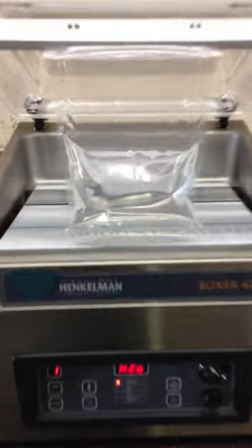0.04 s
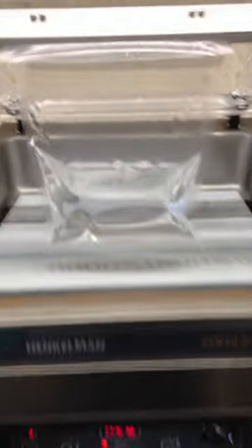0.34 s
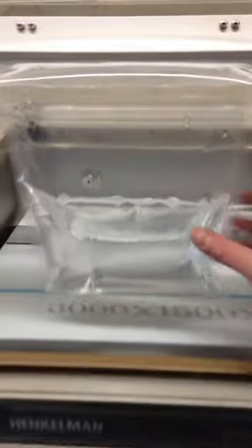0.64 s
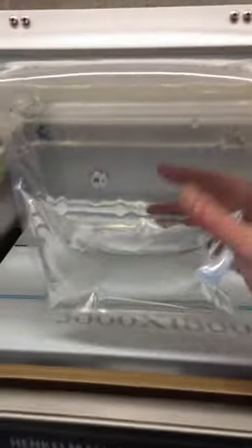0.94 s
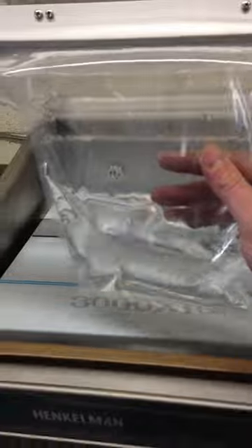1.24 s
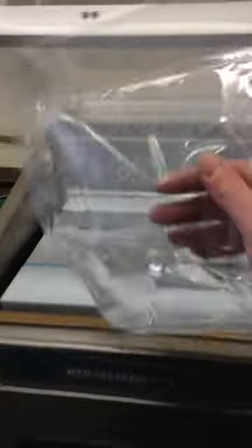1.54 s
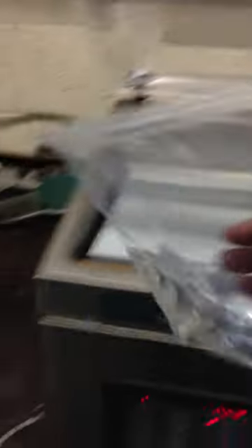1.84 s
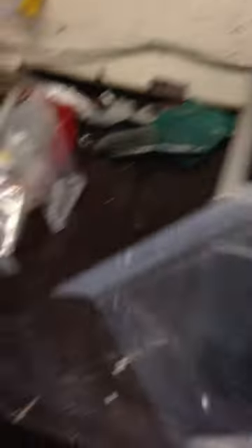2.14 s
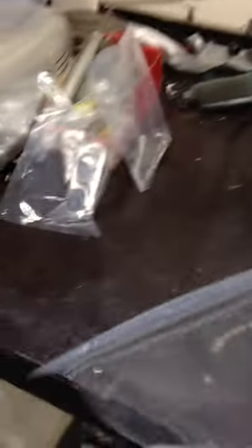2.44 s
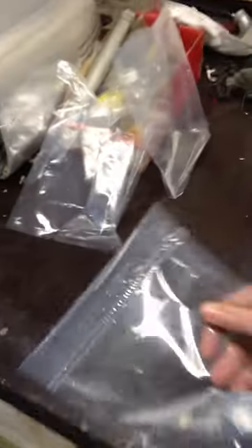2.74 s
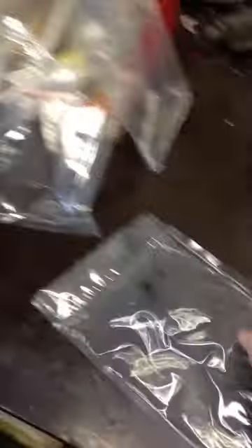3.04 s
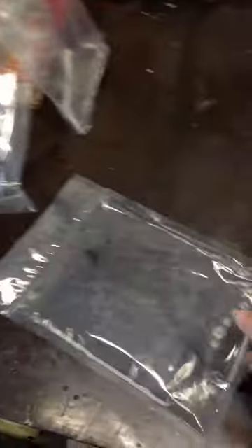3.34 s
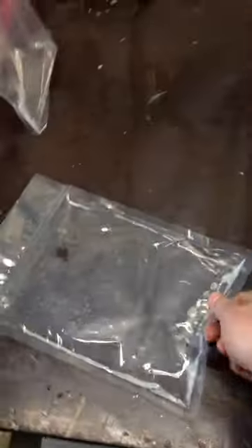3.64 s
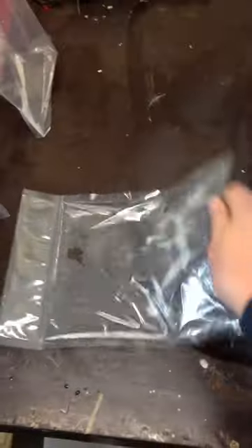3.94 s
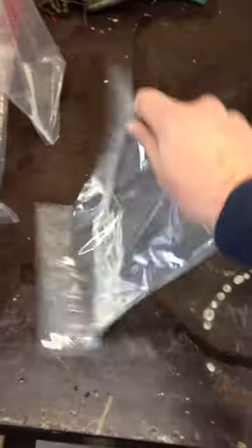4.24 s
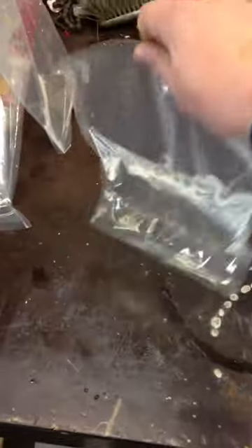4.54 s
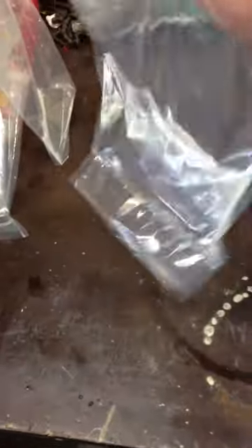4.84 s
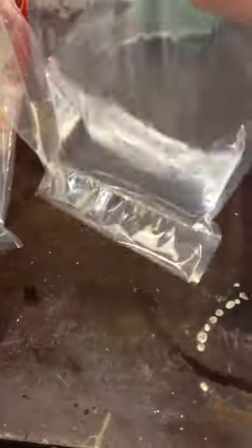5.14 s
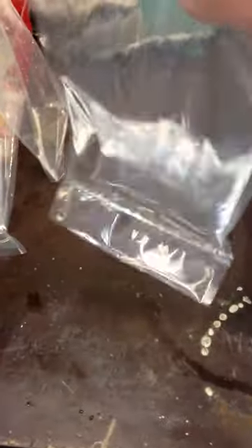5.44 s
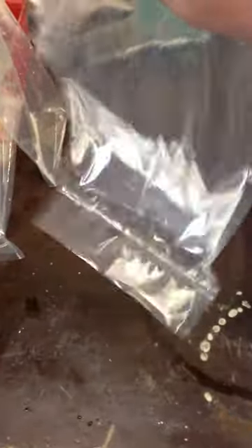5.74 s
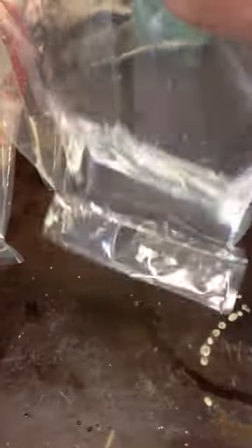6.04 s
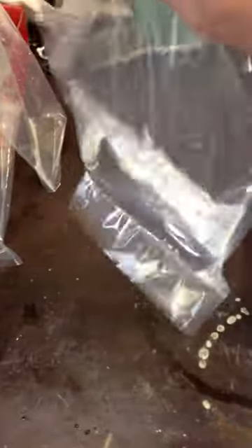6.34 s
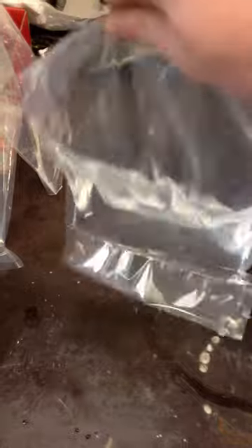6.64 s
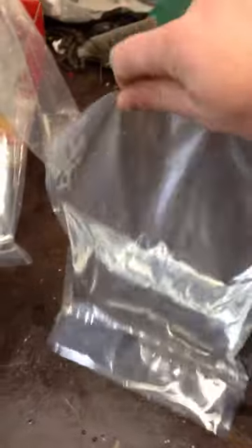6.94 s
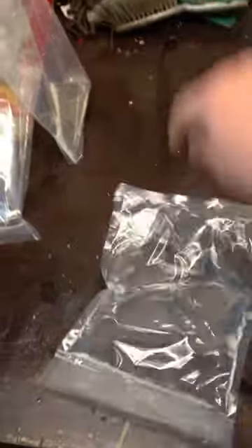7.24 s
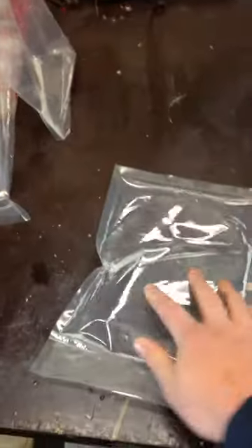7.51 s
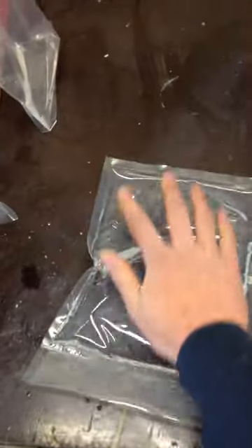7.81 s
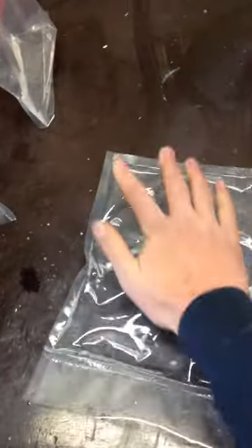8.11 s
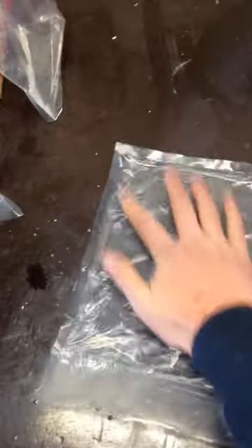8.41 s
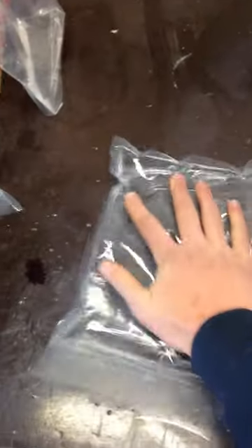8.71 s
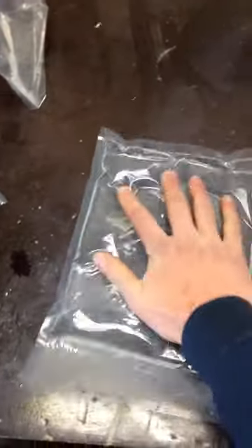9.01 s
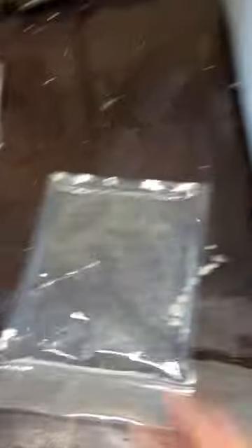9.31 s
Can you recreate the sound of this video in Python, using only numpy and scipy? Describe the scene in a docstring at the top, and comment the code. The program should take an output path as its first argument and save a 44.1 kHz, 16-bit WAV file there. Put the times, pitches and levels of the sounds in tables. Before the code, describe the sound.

Close up in a small room with a short echo, sharp plastic crackles come from a sealed bag of water being picked up. It lands with a slap on a bench, followed by a hollow, humming thud and faint sliding. Quick shaking brings rhythmic sloshing mixed with snapping creases. Then the bag smacks down once more and takes five even, squelchy hand pats that thump the bench top.

```python
"""A sealed plastic bag holding some water, handled at a workbench in a small hard room, one close microphone.
Lifted out of an idle vacuum packer, its stiff film snaps and rustles as creases flip. It is tossed on
the bench; something hollow is bumped and hums on. The bag is slid, then shaken so that the water slaps
the film and traps bubbles. Last it is dropped and patted five times with a flat hand, knocking the bench."""
import sys
import numpy as np
from scipy import signal
from scipy.fft import rfft, irfft, next_fast_len
from scipy.io import wavfile
from scipy.ndimage import map_coordinates

SR = 44100
rng = np.random.default_rng(int(sys.argv[2]) if len(sys.argv) > 2 else 0)


def persist_wave(psi):
    """Save psi, clipped to +-1, as 16-bit WAV."""
    counts = np.round(np.clip(psi, -1, 1) * 32767).astype(np.int16)
    wavfile.write(sys.argv[1], SR, np.atleast_2d(counts).T)


N = 422037
LEAD_S = 0.04  # time a crumple is given to swell to its peak


def amp(db):
    """Decibels to gain."""
    return 10 ** (np.asarray(db) / 20)


def unit(x):
    """Scaled to rms 1."""
    return x / np.sqrt(np.mean(x ** 2) + 1e-20)


def along(points, hz):
    """(frequency [Hz], value) points read on a log axis."""
    freqs, values = np.transpose(points)
    return np.interp(np.log(hz + 1), np.log(freqs + 1), values)


def hump(hz, centre_hz, octaves):
    """A broad resonance of height 1."""
    return 1 / (1 + (np.log2((hz + 1) / centre_hz) / octaves) ** 2)


def envelope(t, rise, hold, t60):
    """Swells up to time 0, holds, then dies away; all in seconds."""
    return np.exp(np.minimum(t, 0) / rise) * amp(-60 * np.maximum(t - hold, 0) / t60)


def wobble(rate):
    """A smooth random curve, rate knots a second."""
    knots = rng.standard_normal(int(N * rate / SR) + 4)
    return map_coordinates(knots, [np.arange(N) * rate / SR])


def add(track, s, x):
    """Mix x into the track from time s on."""
    part = track[round(s * SR):][:len(x)]
    part += x[:len(part)]


def coloured(x, db_at):
    """x through a causal filter whose gain in dB is a function of frequency."""
    size = 2 * next_fast_len(len(x) // 2 + 1024)
    cepstrum = irfft(np.log(amp(db_at(np.fft.rfftfreq(size, 1 / SR)))), size)
    cepstrum[1:size // 2] *= 2  # folded onto positive time: minimum phase
    cepstrum[size // 2 + 1:] = 0
    return irfft(rfft(x, size) * np.exp(rfft(cepstrum)), size)[:len(x)]


def shaped(x, spectrum):
    """x filtered by the given spectrum, at rms 1."""
    return unit(coloured(x, lambda hz: along(spectrum, hz)))


def crackle(size, rate, spread_db):
    """Tiny bucklings of the film: random clicks of unequal size, rate a second, rms 1."""
    sizes = rng.choice([-1, 1], size) * amp(spread_db * np.clip(rng.standard_normal(size), -2, 2))
    return unit(sizes * (rng.random(size) < rate / SR))


def film(x, colour, bass_db, treble_db):
    """The film radiates x: wide folds give more bass, tight creases more treble."""
    wide, tight = [(700, 0.74), (1600, 0.00122)], [(3200, 0.014), (7000, 0.6)]
    return coloured(
        x, lambda hz: along(colour, hz) + bass_db * along(wide, hz) + treble_db * along(tight, hz))


def ring(modes, t, scatter_db, attack):
    """Damped modes, struck at new strengths each time."""
    hz, db, t60 = np.transpose(modes)[:, :, None]
    strength = amp(db + scatter_db * rng.standard_normal(hz.shape) - 60 * t / t60)
    swing = np.sin(2 * np.pi * hz * t + rng.uniform(0, 2 * np.pi, hz.shape))
    return (strength * swing).sum(0) * (1 - np.exp(-t / attack))


# The quiet room around the microphone: (frequency [Hz], level [dB])
ROOM_TONE = [(15, -64), (25, -43), (173, 2.5), (495, -9.5), (537, -11), (804, -10), (997, -10.5),
             (1270, -14), (1410, -15), (1620, -16), (1750, -15), (2300, -13.5), (4620, -15), (13900, -18),
             (15500, -20)]


def room_tone(level_db=-65.5):
    """Low room rumble and faint hiss, wavering slightly."""
    return amp(level_db + 0.72 * wobble(1.4)) * shaped(rng.standard_normal(N), ROOM_TONE)


# The bag slides on the packer's steel, over the bench and out of the fingers:
# (time [s], level [dB], rise [s], length [s], t60 [s], share of quick slips [0-1])
SLIDES = [(0.09, -52, 0.0074, 0.032, 0.32, 0.08), (3.361, -60, 0.19, .11, 0.4, 0.92),
          (3.722, -58, 0.045, 0.017, 0.39, 0.94), (3.892, -54.5, 0.059, 0.067, 0.31, 1),
          (4.007, -57.5, .012, .05, 0.19, 0.38), (4.247, -55, 0.044, 0.058, .36, .65),
          (7.05, -55, 0.0045, 0.023, 0.12, 0.88)]
# Two spectra, slow slips and quick slips: (frequency [Hz], level [dB])
SLIP_COLOURS = [
    [(30, -45), (100, -28), (350, -1), (600, -17), (1200, -4), (1900, -1), (2700, -6), (4500, -35),
     (15000, -34)],
    [(30, -55), (100, -12), (400, -10), (900, -11), (2200, -8.5), (3500, -2.5), (5000, -6), (7000, -11),
     (9000, -15), (15000, -17.5)],
]


def slides(uneven_db=2.5):
    """Sliding film hisses with dense, small slips; quicker slips sound higher, and a few creases catch."""
    hiss, t = np.zeros(N), np.arange(N) / SR
    slow, quick = (shaped(crackle(N, rate=14000, spread_db=2.5), colour) for colour in SLIP_COLOURS)
    for s, db, rise, length, t60, share in SLIDES:
        slips = np.sqrt(1 - share) * slow + np.sqrt(share) * quick
        hiss += amp(db) * envelope(t - s, rise, length, t60) * slips
    hiss *= amp(uneven_db * wobble(30))
    catches = [(s + length, db, length) for s, db, _, length, *_ in SLIDES]
    return hiss + ticks(catches, count=2, gain_db=15.5, treble_db=-24, scatter_db=-2, pitch_hz=1880)


# One crease flipping, heard close: (frequency [Hz], level [dB])
CREASE_COLOUR = [(40, -7), (100, -10.5), (200, 17), (700, 20.5), (1500, 6), (2600, 2.5), (4500, 5),
                 (7000, 3), (10000, -7), (15000, -16.5)]


def flip(treble_db, pitch_hz, flutter_db=-18.5, flutter_t60=0.039, ring_db=-23, ring_t60=0.021):
    """A crease flips with a sharp click and rings at its pitch while the sheet flutters."""
    t = np.arange(SR // 10) / SR
    bass_db = -22 - 7 * np.log2(pitch_hz / 1600)  # small, high creases have less bass
    click = film(signal.unit_impulse(len(t)), CREASE_COLOUR, bass_db, treble_db)
    shiver = amp(flutter_db - 60 * t / flutter_t60) * crackle(len(t), rate=9000, spread_db=4.5)
    flutter = film(shiver, CREASE_COLOUR, bass_db, treble_db - 4)
    note = ring([(pitch_hz, ring_db, ring_t60)], t, scatter_db=1.5, attack=0.00028)
    return coloured(click + flutter + note, lambda hz: 5 * hump(hz, pitch_hz, octaves=0.36))


def ticks(moves, count, gain_db, treble_db, scatter_db, pitch_hz):
    """Each movement (time [s], level [dB], length [s]) flips a few small creases at random."""
    out = np.zeros(N)
    for s, db, length in moves:
        times = s + rng.random(count) * length
        creases = np.clip(rng.standard_normal((count, 3)), -1.5, 1.5)
        for when, (size, tightness, pitch) in zip(times, creases):
            tick = flip(treble_db + 7 * tightness, pitch_hz * 2 ** (pitch / 2))
            add(out, when, amp(db + gain_db + scatter_db * size) * tick)
    return out


def crumple(colour, bass_db, treble_db, rise, hold, t60, rate, spread_db, clump_db=0):
    """Many creases buckle at once, evenly or in clumps; the swell tops out LEAD_S after the start."""
    t = np.arange(SR // 3) / SR - LEAD_S
    clumps = amp(clump_db * wobble(109)[:len(t)])
    buckling = envelope(t, rise, hold, t60) * clumps * crackle(len(t), rate, spread_db)
    return film(buckling, colour, bass_db, treble_db)


def bubbles(moves, count, gain_db, pitch_hz, octaves, cycles, lag_s):
    """Moving water (time [s], level [dB], length [s]) traps bubbles that ring briefly, rising in pitch."""
    out, t = np.zeros(N), np.arange(SR // 16) / SR
    for s, db, length in moves:
        times = s + rng.random(count) * length
        for when, (pitch, size, late) in zip(times, rng.standard_normal((count, 3))):
            hz = pitch_hz * 2 ** (octaves * np.clip(pitch, -2, 2))
            age = t * hz / cycles  # 1 when the bubble has died away
            swing = np.sin(2 * np.pi * hz * t * (1 + 0.08 * np.minimum(age, 1)))
            life = amp(-60 * age) * (1 - np.exp(-t * hz))
            add(out, when + lag_s * abs(late), amp(db + gain_db + 2 * size) * swing * life)
    return out


# Water surges in the bag near the microphone, about seven times a second while shaken:
# (time [s], level [dB], length [s])
SURGES = [(0.481, -55, .004), (1.074, -50, 0.1), (1.326, -42.5, 0.069), (2.046, -44, 0.0028),
          (2.079, -48, .003), (2.327, -40, .004), (2.398, -53, 0.0047), (2.48, -48.5, 0.0024),
          (4.422, -43, .003), (4.769, -38.5, 0.061), (4.901, -31, 0.033), (4.987, -34.5, 0.035),
          (5.057, -33, 0.07), (5.217, -31.5, 0.021), (5.367, -27.5, 0.012), (5.488, -36, 0.027),
          (5.629, -26, .01), (5.739, -33.5, 0.089), (5.898, -28.5, .03), (6.04, -32, 0.016),
          (6.176, -34.5, 0.069), (6.311, -36, 0.026), (6.433, -38, .012), (6.595, -27, 0.012),
          (7.03, -40.5, .004)]
# The slack film crumpling around the water: (frequency [Hz], level [dB])
SLACK_COLOUR = [(25, -53), (60, -30), (100, 3), (170, 18.5), (350, 18), (700, 10), (1300, 7.5), (2400, -4),
                (4500, -5.5), (7000, -10.5), (10000, -16), (15000, -22.5)]


def sloshes(slap_db=-8, surge_db=-9):
    """Each surge slaps and crumples the film, flips small creases and traps bubbles, large and small."""
    out = np.zeros(N)
    for s, db, length in SURGES:
        slap = crumple(SLACK_COLOUR, bass_db=-7.5, treble_db=-38,
                       rise=0.0005, hold=0, t60=0.072, rate=3000, spread_db=4)
        surge = crumple(SLACK_COLOUR, bass_db=-9, treble_db=-42,
                        rise=0.0019, hold=length, t60=0.091, rate=1500, spread_db=9.5, clump_db=4)
        add(out, s - LEAD_S, amp(db) * (amp(slap_db) * slap + amp(surge_db) * surge))
    creases = ticks(SURGES, count=3, gain_db=5, treble_db=-22, scatter_db=0.5, pitch_hz=1584)
    large = bubbles(SURGES, count=2, gain_db=-6.5, pitch_hz=350, octaves=0.43, cycles=11.4, lag_s=0.00588)
    small = bubbles(SURGES, count=5, gain_db=-7.5, pitch_hz=1146, octaves=0.5, cycles=24.7, lag_s=0.0065)
    return out + creases + large + small


# The loudest creases, close to the microphone: (time [s], level [dB], treble [dB], pitch [Hz])
BIG_CREASES = [(0.7638, -38, -27, 1920), (1.1734, -24.5, -46, 1540), (1.426, -17, -30, 2720),
               (1.5991, -17, -10, 2590), (1.7435, -12.5, -5, 2550), (2.018, -43.5, -11, 1350),
               (2.1045, -34, -21, 1020), (3.399, -26.5, -9, 2960), (3.4619, -33.5, -4, 2160),
               (4.005, -32, -27, 1780), (4.2961, -31, -7, 1900), (4.329, -32, -12, 706),
               (4.3752, -25, -31, 1920), (4.6325, -34, -47, 2110), (4.7317, -23.5, -2.5, 3730),
               (4.8368, -21, -21, 3670), (4.8669, -24, -16, 1660), (4.9035, -14.5, -19, 1740),
               (4.9889, -20, -31, 1650), (5.1284, -19.5, -19, 1570), (5.2698, -28, 7, 2630),
               (5.2914, -23, -23, 1080), (5.4243, -18.5, -36, 2620), (5.5612, -26, -23, 1735),
               (5.5831, -24.5, -32, 2430), (5.688, -18.5, -15, 2190), (5.7024, -19, -9.5, 2230),
               (5.8161, -22.5, -15, 2130), (5.835, -23, -22, 1090), (5.896, -22, -21, 2540),
               (5.9578, -26.5, 10.5, 2480), (5.979, -19, -4, 2740), (6.118, -25.5, -8, 2420),
               (6.2305, -23, -16, 1030), (6.3708, -21, -15, 3010), (6.3885, -19.5, -30, 1600),
               (6.4279, -23, -13, 2570), (6.504, -24, -6, 1020), (6.532, -22.5, -0.5, 1830),
               (6.6522, -25.5, 1, 3030), (6.6913, -14.5, 1.5, 4500), (6.7622, -21, -24, 950),
               (6.8775, -27, -36, 1674), (7.0046, -27.5, -21, 1180), (7.35, -32, -10, 1800),
               (8.3328, -35, 15, 6030), (8.831, -35, 4, 1590), (9.0396, -31, -6, 3300),
               (9.211, -40, -13, 2080)]


def snaps(gain_db=6.5):
    """The big creases of the stiff film flip over one by one."""
    out = np.zeros(N)
    for s, db, treble_db, pitch_hz in BIG_CREASES:
        add(out, s, amp(db + gain_db) * flip(treble_db, pitch_hz))
    return out


def rustle(strain, colour, rate, uneven_db=3):
    """Fine crinkling goes on, in small clumps, while the bag moves."""
    return strain * amp(uneven_db * wobble(45)) * shaped(crackle(N, rate, spread_db=3.5), colour)


# Crinkling as the bag comes out of the packer: (time [s], level [dB])
LIFT_LEVELS = [(0.95, -89), (1.06, -64), (1.27, -69.5), (1.36, -55), (1.49, -51), (1.66, -61.5),
               (1.76, -53.5), (2.0, -73)]
# Its spectrum at close range: (frequency [Hz], level [dB])
CRINKLE_COLOUR = [(40, -25), (110, -8), (250, 5.5), (500, -8), (1200, -5), (3000, -5), (5000, -9.5),
                  (9000, -17.5), (15000, -23)]


def lifting():
    """The film crinkles and ticks as it is lifted, and the water stirs inside."""
    stirs = [(s - 0.05, db, 0.12) for s, db in LIFT_LEVELS]
    creases = ticks(stirs, count=4, gain_db=18.5, treble_db=-20, scatter_db=3, pitch_hz=2100)
    water = bubbles(stirs, count=8, gain_db=4, pitch_hz=382, octaves=0.51, cycles=13, lag_s=0.00573)
    times, levels = np.transpose(LIFT_LEVELS)
    strain = amp(np.interp(np.arange(N) / SR, times, levels, left=-np.inf, right=-np.inf))
    return rustle(strain, CRINKLE_COLOUR, rate=2500) + creases + water


# The hand closes on the bag during the lift: (time [s], level [dB], rise [s], length [s])
FINGER_GRIPS = [(1.487, -30.5, 0.013, 0.023), (1.726, -24, 0.003, 0.0024), (1.851, -34, 0.0048, 0.015)]


def grips(gain_db=-4.5):
    """Fingers crush the stiff film in short, bright crunches."""
    out = np.zeros(N)
    for s, db, rise, length in FINGER_GRIPS:
        crunch = crumple(SLACK_COLOUR, bass_db=-22.5, treble_db=5,
                         rise=rise, hold=length, t60=0.039, rate=4900, spread_db=5.5)
        add(out, s - LEAD_S, amp(db + gain_db) * crunch)
    return out


# The bag lands on the workbench:
# (time [s], flop [dB], slam [dB], treble [dB], lead of the edge [s], edge [dB], knock [dB])
DROPS = [(2.8843, -10.5, -12, -16, .066, -31.5, -32.5), (7.1853, -14.5, -8, -0.5, .0255, -23.5, -32.5)]
# Film hitting the bench top: (frequency [Hz], level [dB])
DROP_COLOUR = [(25, -46.5), (60, -28), (100, -5), (190, 13.5), (500, 9.5), (850, 8.5), (1300, 2.5),
               (2100, 0), (3200, -2), (4500, 0), (7000, -4), (10000, -9.5), (15000, -18.5)]


def landings(gain_db=-3, slam_delay_s=0.018, settle_db=-12):
    """An edge touches, the film flops down, the water slams after it, and the bag settles, ticking."""
    out = np.zeros(N)
    for s, db, slam_db, treble_db, lead, edge_db, knock_db in DROPS:
        touch = crumple(DROP_COLOUR, bass_db=-13.5, treble_db=-4.5,
                        rise=0.00037, hold=0, t60=0.08, rate=7700, spread_db=6.5)
        edge = crumple(DROP_COLOUR, bass_db=-7.5, treble_db=-10,
                       rise=0.0012, hold=lead, t60=0.089, rate=4000, spread_db=4, clump_db=3)
        flop = crumple(DROP_COLOUR, bass_db=-16, treble_db=treble_db,
                       rise=0.00093, hold=0.0036, t60=0.11, rate=7900, spread_db=3)
        slam = crumple(DROP_COLOUR, bass_db=-19, treble_db=-22.5,
                       rise=0.00065, hold=0.0028, t60=0.078, rate=7000, spread_db=4.5)
        settle = crumple(DROP_COLOUR, bass_db=-30.5, treble_db=-9.5,
                         rise=0.005, hold=0, t60=0.32, rate=3300, spread_db=8.5, clump_db=5)
        start = s - LEAD_S
        add(out, start - lead, amp(edge_db) * (amp(-7.5) * touch + amp(-6) * edge))
        add(out, start, amp(db + gain_db) * flop)
        add(out, start + slam_delay_s, amp(slam_db + gain_db) * slam)
        add(out, start + slam_delay_s, amp(db + settle_db + gain_db) * settle)
        add(out, s + 0.0042, amp(knock_db) * knock())
    settling = [(s + 0.035, db, 0.07) for s, db, *_ in DROPS]
    return out + ticks(settling, count=4, gain_db=-19, treble_db=-13, scatter_db=-3, pitch_hz=2200)


# The bench top under the bag: (frequency [Hz], level [dB], t60 [s])
BENCH_MODES = [(51, -28, 0.39), (98.6, -9, 0.43), (134.4, -16, 0.38), (176, -2, 0.23), (193, 4, 0.098),
               (219.6, -5, 0.25), (304.3, -5.5, 0.22), (335.2, -4, 0.17), (455, -7, 0.13),
               (538, -18.5, 0.27)]


def knock(detune=0.016):
    """The water passes a blow on to the bench top; the load shifts its modes a little each time."""
    loaded = [(hz * (1 + detune * rng.standard_normal()), db, t60) for hz, db, t60 in BENCH_MODES]
    return amp(-5) * ring(loaded, np.arange(SR) / SR, scatter_db=0.5, attack=0.0049)


# A soft bump on something hollow in the room: (time [s], level [dB])
BUMPS = [(3.16, -28.5)]
# Its dull thud: (frequency [Hz], level [dB])
THUD_COLOUR = [(40, -29), (100, -11), (180, 0), (300, -4), (520, -9), (780, -10), (1050, -21.5),
               (1500, -34), (4000, -42)]
# The hollow body ringing on: (frequency [Hz], level [dB], t60 [s])
HOLLOW_MODES = [(176, -11, 0.57), (177.6, -2, 1.7), (300, -9.5, 0.72), (460, -13.5, 0.71), (531, -2, 0.23),
                (715, -22, .45), (783, -4.5, 0.37)]


def bump(thud_db=-7, thud_t60=0.34, hum_db=-10):
    """A dull, shuddering knock on a hollow body leaves one low note humming."""
    out, t = np.zeros(N), np.arange(2 * SR) / SR
    for s, db in BUMPS:
        fade = amp(thud_db - 60 * t / thud_t60) * (1 - np.exp(-t / 0.0048))
        shudder = fade * shaped(rng.standard_normal(len(t)), THUD_COLOUR)
        hum = ring(HOLLOW_MODES, t, scatter_db=1.5, attack=0.015)
        add(out, s, amp(db) * (shudder + amp(hum_db) * hum))
    return out


# The bag swinging near the microphone: (frequency [Hz], level [dB])
SWISH_COLOUR = [(40, -37.5), (130, 12), (300, 3.5), (1000, 0.5), (2500, -5.5), (5000, -18.5), (15000, -55)]


def shaking(start_s=4.87, length_s=1.75, level_db=-58.5):
    """The hanging bag swishes as it is shaken."""
    swinging = envelope(np.arange(N) / SR - start_s, rise=0.088, hold=length_s, t60=1.0)
    return rustle(amp(level_db) * swinging, SWISH_COLOUR, rate=680)


# A flat hand strikes and squashes the bag on the bench:
# (time [s], slap [dB], bass [dB], rise [s], t60 [s], squash delay [s], squash [dB], knock [dB])
PALM_STRIKES = [(7.974, -21, -11, 0.0059, 0.072, 0.039, -30.5, -34.5),
                (8.2277, -20, -17, 0.00033, .14, 0.026, -20, -26.5),
                (8.4743, -16.5, -20.5, 0.00042, 0.17, .016, -15.5, -22.5),
                (8.7124, -19.5, -20, .0012, 0.14, 0.042, -20.5, -25),
                (8.9514, -12.5, 2.5, .0007, 0.078, 0.041, -24.5, -24.5)]
# Palm on film, heard close: (frequency [Hz], level [dB])
PALM_COLOUR = [(40, -11), (100, -7), (200, 5.5), (450, 5.5), (700, 6), (1300, 5), (2000, 5), (3000, 1),
               (4500, 4), (7000, 3), (10000, -1.5), (15000, -8.5)]


def pats(gain_db=-4, squelch_hz=1950, squelch_db=6):
    """A bright slap knocks the bench; then the water is squeezed aside with a duller, bubbling squelch."""
    out = np.zeros(N)
    for s, db, bass_db, rise, t60, delay, squash_db, knock_db in PALM_STRIKES:
        slap = crumple(PALM_COLOUR, bass_db, treble_db=-13.5,
                       rise=rise, hold=0.0023, t60=t60, rate=7500, spread_db=2.5)
        squash = crumple(PALM_COLOUR, bass_db=-12, treble_db=-26.5,
                         rise=0.0071, hold=0.0018, t60=0.12, rate=4000, spread_db=4.5, clump_db=2.5)
        squelch = coloured(squash, lambda hz: squelch_db * (hump(hz, squelch_hz, octaves=0.21) - 0.5))
        add(out, s - LEAD_S, amp(db + gain_db) * slap)
        add(out, s + delay - LEAD_S, amp(squash_db + gain_db) * squelch)
        add(out, s, amp(knock_db) * knock())
    squeezes = [(s + delay - 0.012, db, 0.025) for s, *_, delay, db, _ in PALM_STRIKES]
    out += bubbles(squeezes, count=10, gain_db=-12, pitch_hz=1850, octaves=0.31, cycles=22, lag_s=0.008)
    relaxing = [(s + 0.025, db, 0.09) for s, db, *_ in PALM_STRIKES]
    return out + ticks(relaxing, count=3, gain_db=-14.5, treble_db=-13, scatter_db=6, pitch_hz=2400)


# The small hard room around the bench: (frequency [Hz], t60 [s])
ROOM_DECAY = [(100, 0.71), (500, 0.61), (2000, 0.48), (5000, 0.35), (12000, 0.27)]


def room(x, build_up_s=0.0026):
    """The walls answer with a short, diffuse echo, treble dying first."""
    out, block = np.zeros(N), SR // 4  # a new random tail every quarter second, so no one pitch rings
    for start in range(0, N, block):
        hz, t, noise = signal.stft(rng.standard_normal(SR // 2), SR, nperseg=256)
        decay = amp(-60 * t / along(ROOM_DECAY, hz)[:, None])
        _, tail = signal.istft(noise * decay, SR, nperseg=256)
        tail *= 1 - np.exp(-np.arange(len(tail)) / SR / build_up_s)
        add(out, start / SR, signal.fftconvolve(x[start:start + block], tail / np.linalg.norm(tail)))
    return out


def scene():
    """The bag is held near the microphone; blows on the bench stir the room more."""
    held = snaps() + grips() + sloshes() + lifting() + shaking() + slides()
    struck = landings() + pats() + bump()
    echoes = amp(-16) * room(held) + amp(-14.5) * room(struck)
    return (held + struck + echoes + room_tone())[None]


def record(dry):
    """One microphone, mono, with nothing kept above the band limit."""
    top_hz = 15500
    size = next_fast_len(N + SR // 2)
    in_band = np.fft.rfftfreq(size, 1 / SR) < top_hz
    return irfft(rfft(dry, size) * in_band, size)[..., :N]


dry = scene()
out = record(dry)
persist_wave(out)
```